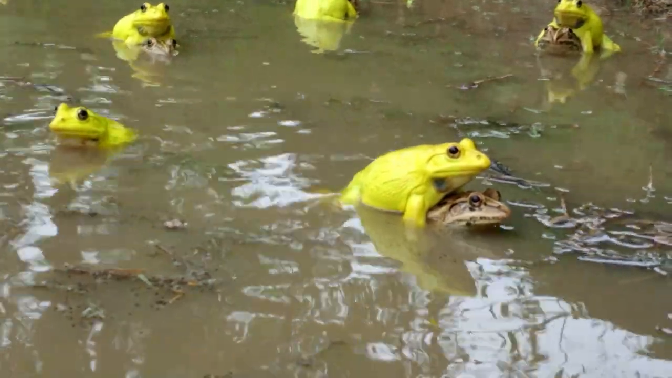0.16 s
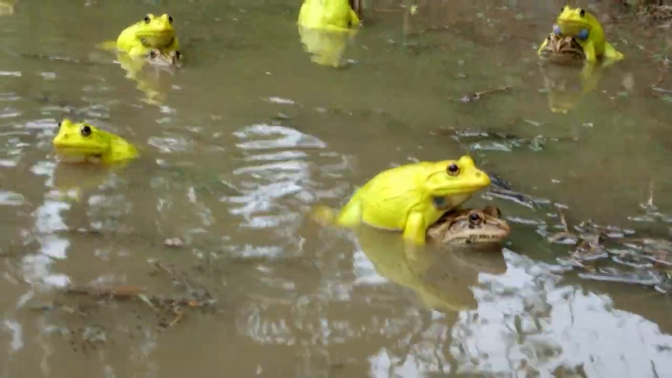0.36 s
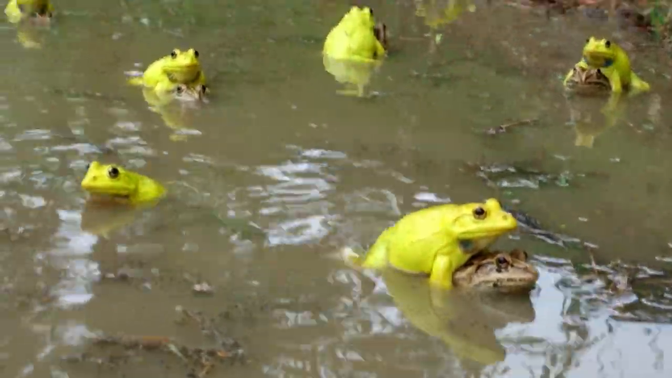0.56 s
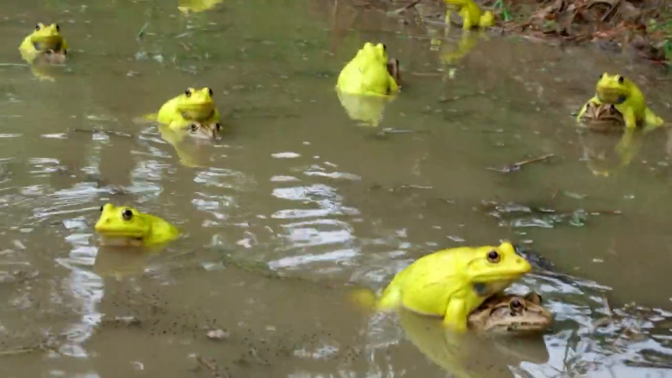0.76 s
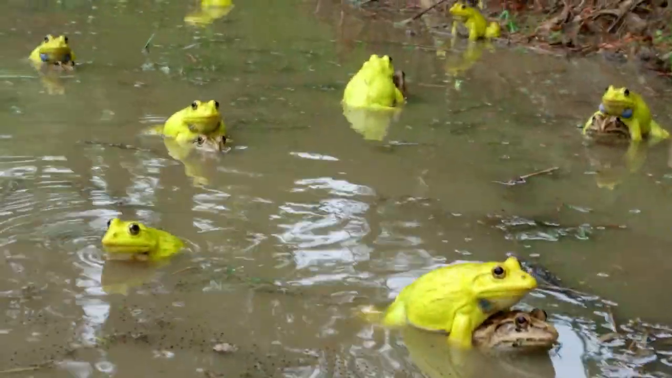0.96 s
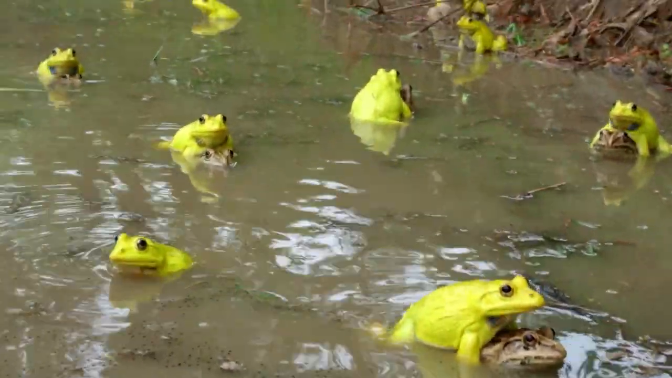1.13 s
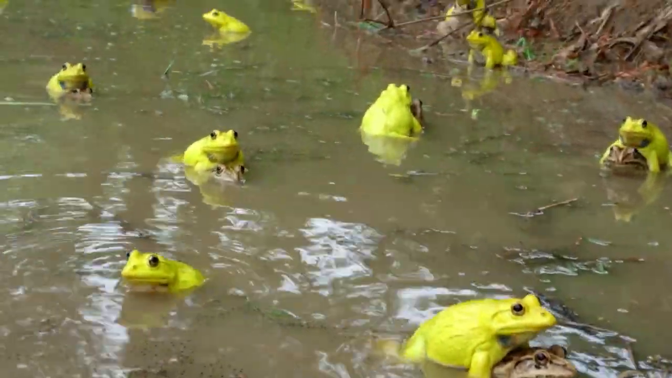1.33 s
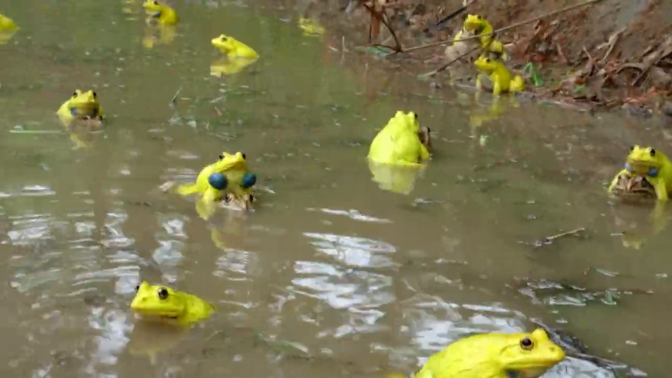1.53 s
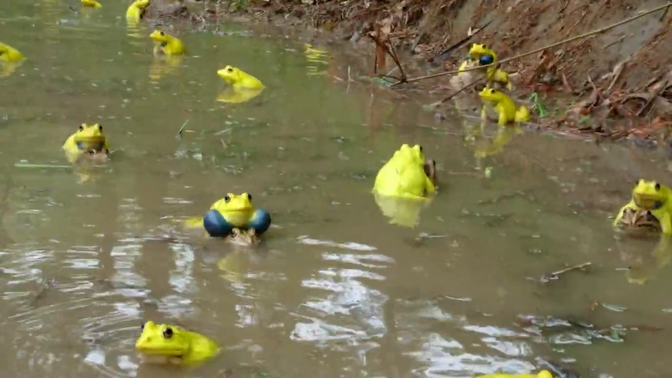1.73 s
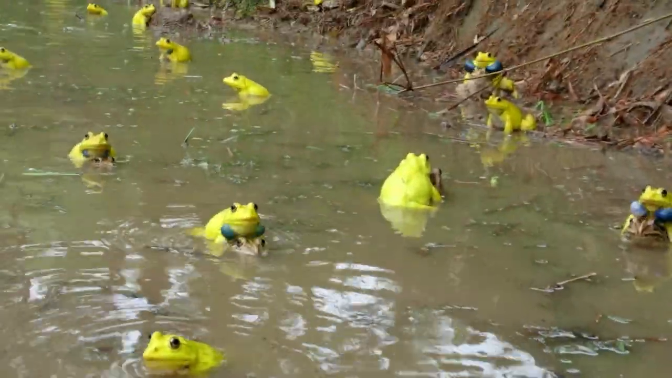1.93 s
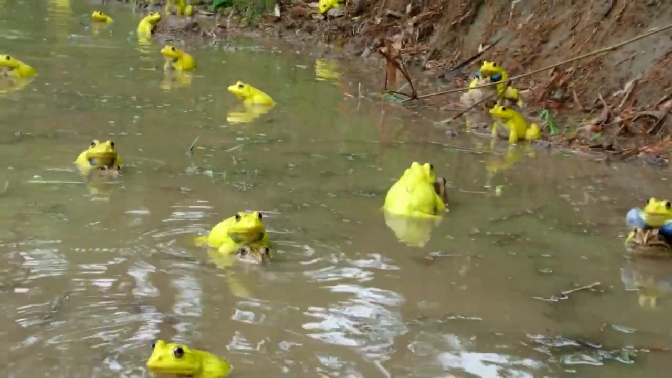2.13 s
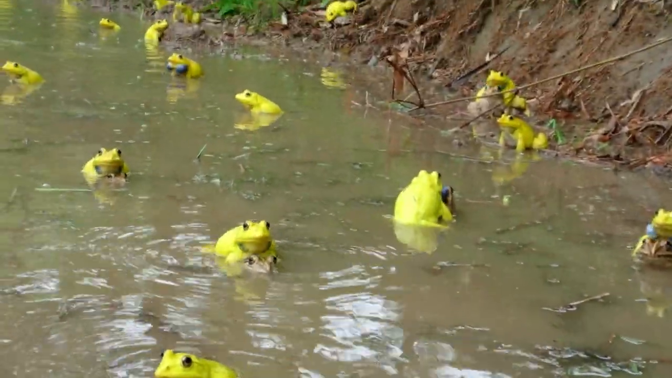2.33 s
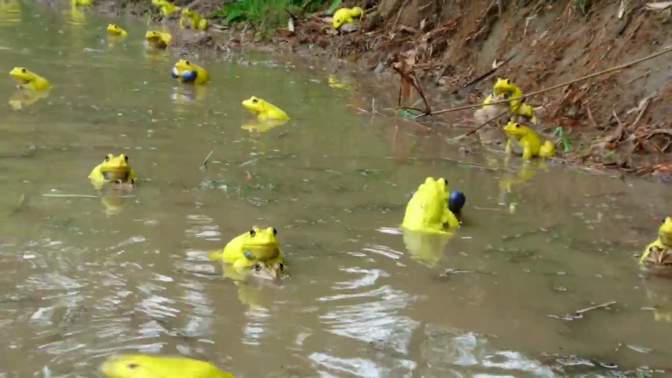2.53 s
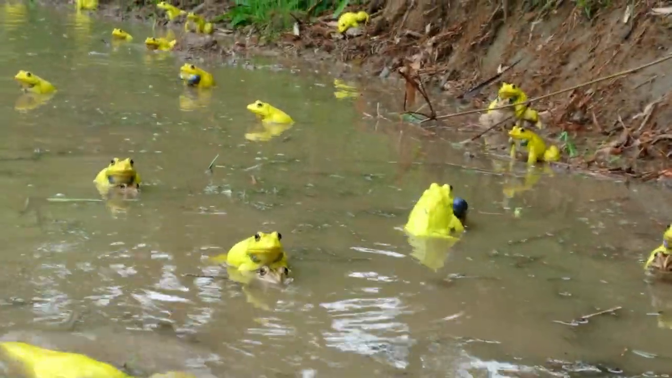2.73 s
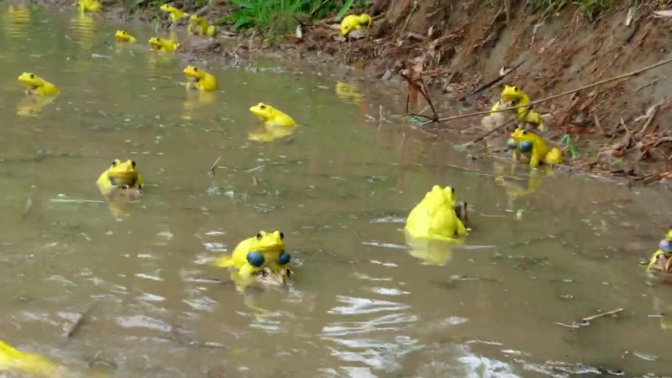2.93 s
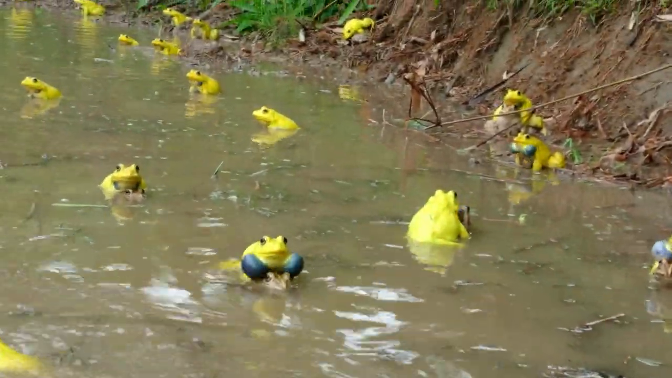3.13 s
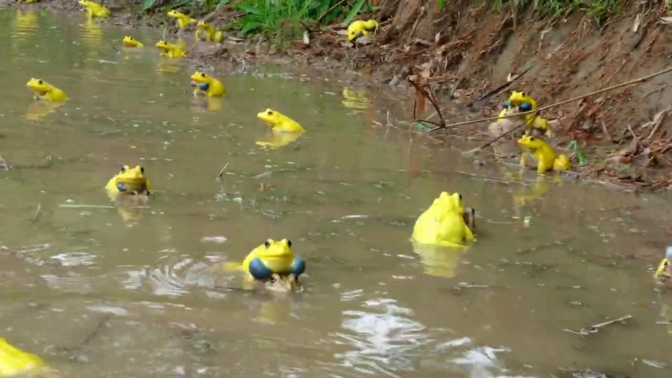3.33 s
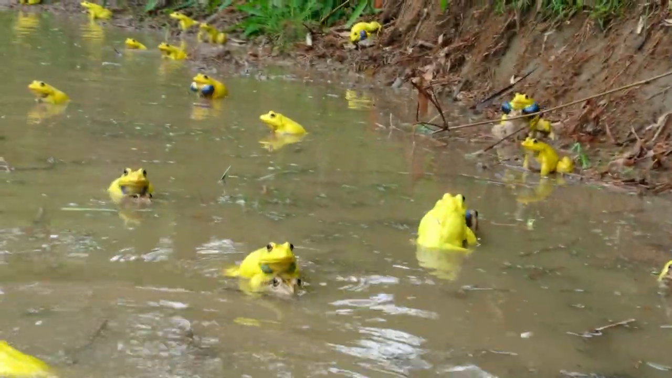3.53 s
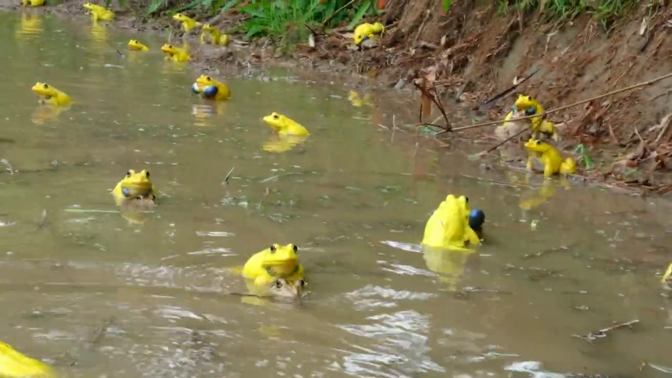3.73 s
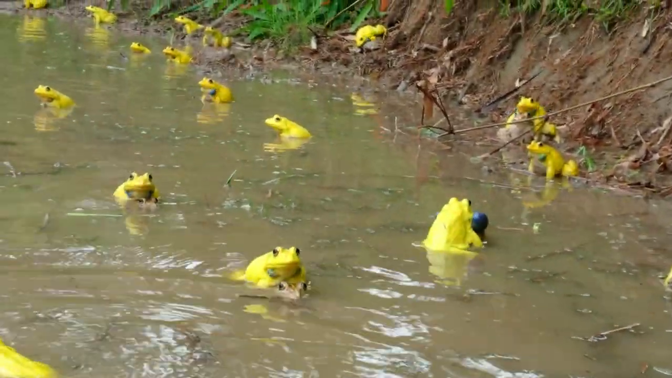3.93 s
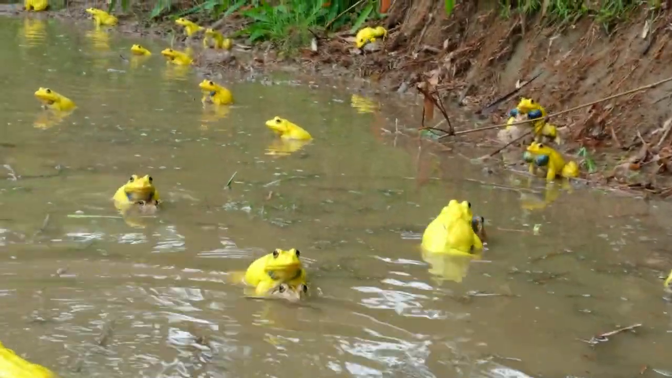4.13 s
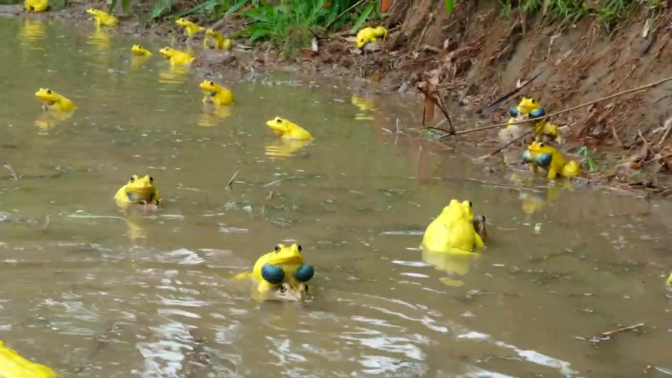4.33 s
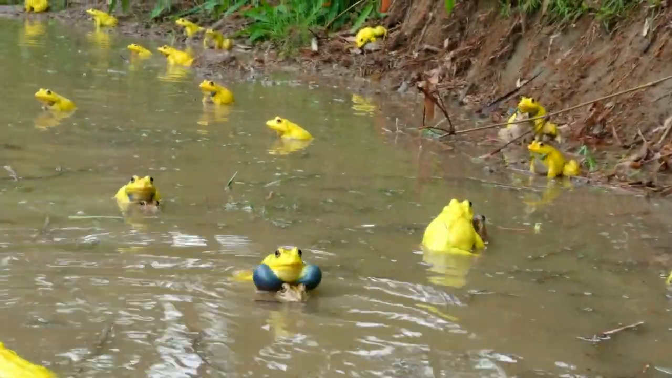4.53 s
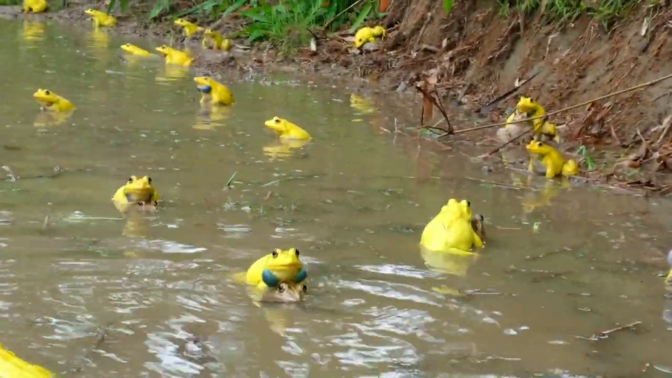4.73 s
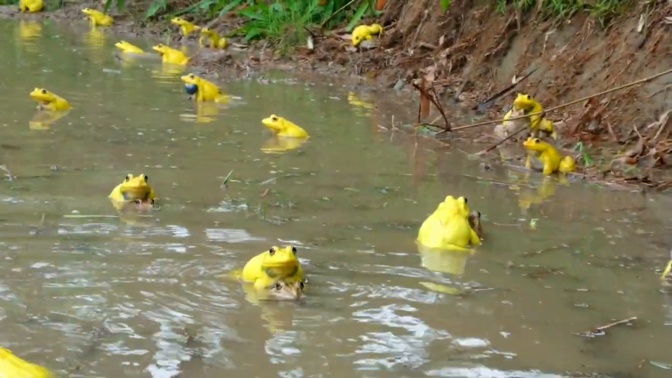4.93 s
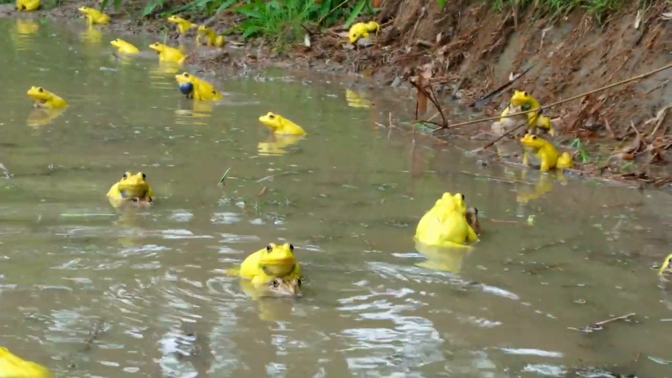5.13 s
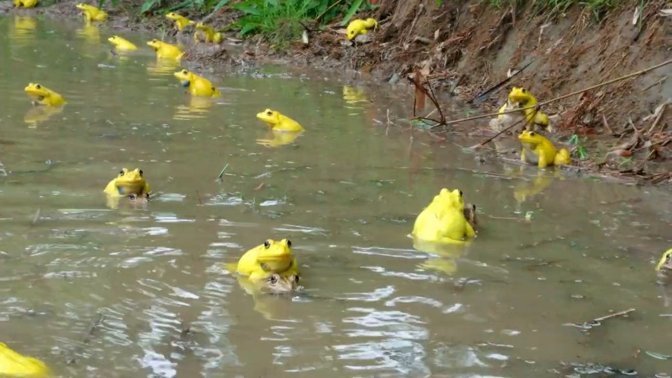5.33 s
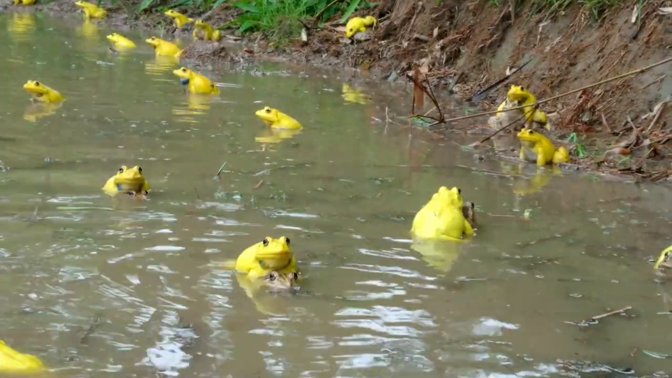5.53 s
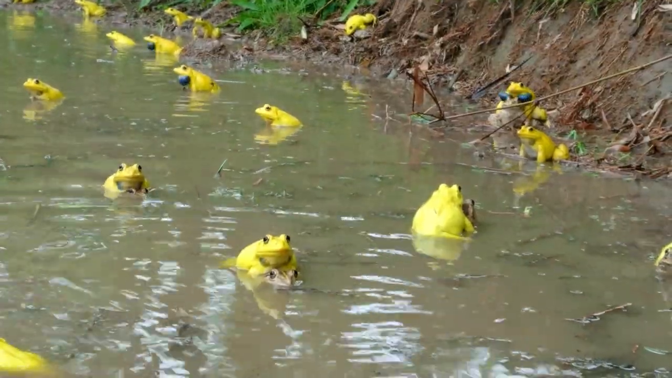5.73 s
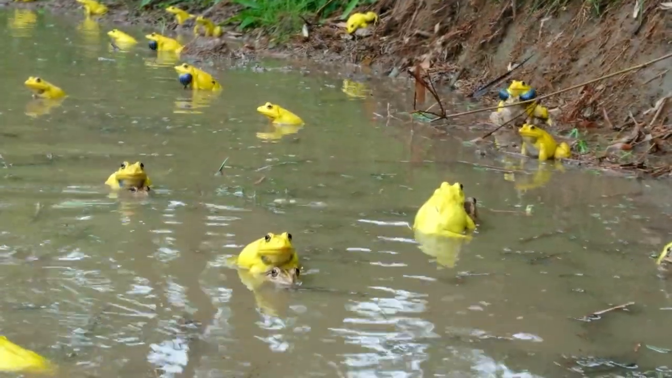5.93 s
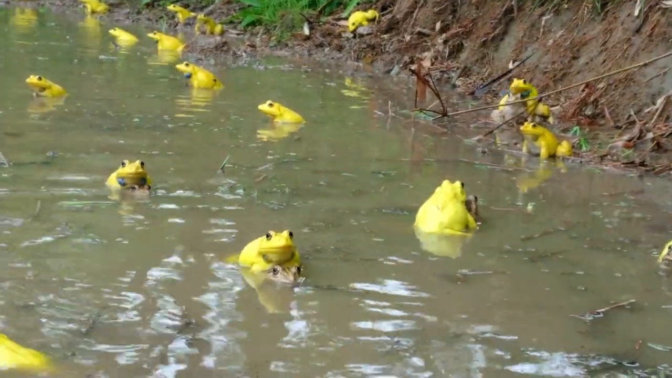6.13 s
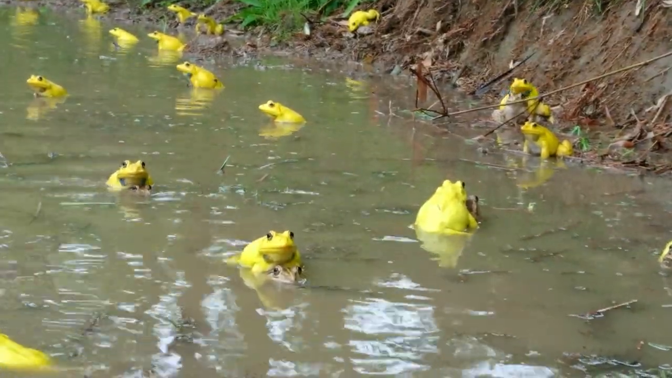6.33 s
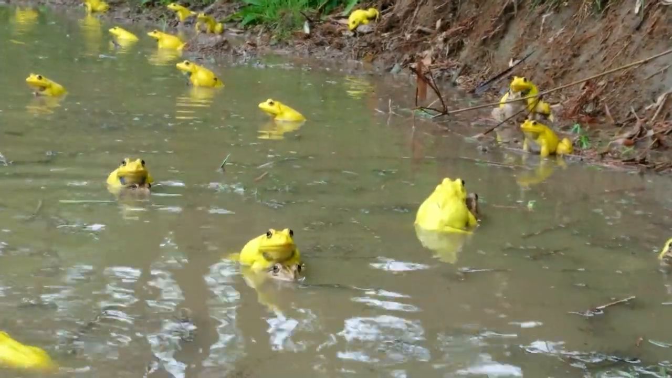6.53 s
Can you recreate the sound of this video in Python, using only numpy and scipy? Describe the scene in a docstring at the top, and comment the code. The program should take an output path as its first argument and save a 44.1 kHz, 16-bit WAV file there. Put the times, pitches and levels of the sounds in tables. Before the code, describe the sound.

Outdoors at a muddy pond, many frogs trade short, hard, pulsing croaks, each a fast train of hollow snaps that slows as it ends. Sparse at first, with ticking and chirps between, they become dense and loud, then grow faint and distant before one stronger call near the end. Light water splashes and soft air lie underneath. The close microphone overloads slightly, with a short echo off the bank.

```python
"""Male bullfrogs croak over one another in a shallow muddy pond below an earth bank, over a soft bed of air.
It opens inside a croak; a thin insect hiss and one frog's soft ticks fill the first lull, then a bird chirps.
The croaks crowd together, one with a shrill ring, and thin out; late on comes a long faint insect tone.
Each croak is a train of snaps, about 75 a second, that rings the vocal sacs and slows as the air runs out.
Small splashes come now and then; they, the hiss and the air are shaped noise, bird and tone pure glides."""
import sys
import numpy as np
from scipy import signal
from scipy.fft import rfft, irfft
from scipy.io import wavfile
from scipy.ndimage import uniform_filter1d, minimum_filter1d

SR = 44100
rng = np.random.default_rng(int(sys.argv[2]) if len(sys.argv) > 2 else 0)


def bounce(signal):
    """Save signal as a 16-bit WAV file at the path given by the first command-line argument."""
    frames = np.transpose(np.atleast_2d(signal))
    limited = np.clip(frames, -1, 1)
    pcm = np.round(limited * 32767).astype(np.int16)
    wavfile.write(sys.argv[1], SR, pcm)


N = 289737  # length in samples, about 6.6 s


def from_db(db):
    """Turn decibels into a plain multiplier."""
    return 10 ** (np.asarray(db) / 20)


def panned(x, pan_db):
    """Share a sound between left and right; a positive pan_db makes the left louder."""
    return x * from_db([[pan_db / 2], [-pan_db / 2]])


def add(out, start_s, x):
    """Mix x into out from start_s on, leaving off whatever falls outside."""
    at = round(start_s * SR)
    first, last = max(at, 0), min(at + x.shape[1], N)
    out[:, first:last] += x[:, first - at:last - at]


def cut(x, hz, kind, order):
    """Butterworth filter: "low" keeps what is below hz, "high" what is above."""
    sos = signal.butter(order, min(hz, .45 * SR), kind, fs=SR, output="sos")
    return signal.sosfilt(sos, x)


def noise(colour, size):
    """Stereo hiss whose spectrum follows the (pitch_hz, level_db) points; average power 1."""
    hz, db = np.transpose(colour)
    bin_hz = np.arange(size // 2 + 1) * SR / size
    gain = from_db(np.interp(np.log(bin_hz + 1), np.log(hz), db))
    x = irfft(rfft(rng.standard_normal((2, size))) * gain, size)
    return x / x.std()


def ring(t, hz, width_hz, hold_s=0):
    """A resonance struck at t = 0; a wider one dies faster, and hold_s delays the dying."""
    after = np.maximum(t, 0)
    fade = np.exp(-np.pi * width_hz * (np.hypot(after, hold_s) - hold_s))
    return fade * np.sin(2 * np.pi * hz * after)


def falling_ring(t, hz, width_hz, fall_hz, fall_s=.005):
    """A resonance that starts sharp by fall_hz and sinks to its pitch within each pulse."""
    after = np.maximum(t, 0)
    cycles = hz * after + fall_hz * fall_s * (1 - np.exp(-after / fall_s))
    return np.exp(-np.pi * width_hz * after) * np.sin(2 * np.pi * cycles)


def swing(t, hz, spread_s):
    """A few cycles that swell and fade around t = 0."""
    return np.exp(-.5 * (t / spread_s) ** 2) * np.cos(2 * np.pi * hz * t)


def arch(points, u):
    """A smooth bend through the values at the opening, middle and close of a call."""
    return np.polyval(np.polyfit([0, .5, 1], points, 2), u)


# Colour of the sound scattered by the bank: pitch_hz [Hz], relative level_db [dB]
BANK_COLOUR = [(200, 5.5), (500, 23.5), (1500, 21.5), (3500, 22.5), (6000, 15), (16000, -26)]


def pond_echoes(x, nearness_db=0, ripple_db=-22, scatter_db=-8.8, t60=0.22):
    """Each use draws a few short reflections and a scatter from the bank that fades 60 dB in t60 seconds."""
    t = np.arange(SR // 5) / SR
    scatter = noise(BANK_COLOUR, size=len(t)) * from_db(-60 * t / t60) * (t > .002)
    scatter = scatter / np.sqrt(np.sum(scatter ** 2) / 2)
    response = from_db(scatter_db - nearness_db) * scatter
    response[:, 0] += 1  # the direct sound
    for lag_s in rng.uniform(0.00047, 0.002895, 3):
        reflection = from_db(ripple_db) * rng.uniform(0, 2, 2) * rng.choice([-1, 1])
        response[:, round(lag_s * SR)] += reflection
    return signal.fftconvolve(x[None], response, axes=1)


# Colour of still air, with a low hum and insect hiss: pitch_hz [Hz], relative level_db [dB per Hz]
AIR_COLOUR = [(25, -17), (60, -5), (100, -3), (140, 8.5), (200, -10), (500, -8), (1000, -19), (2500, -9),
              (3800, -8), (5300, -13), (6500, -25), (8400, -22.5), (9700, -9.5), (11200, -30), (16000, -33)]


def still_air(level_db=-56.3, pan_db=-3.5):
    """Steady coloured noise, a little stronger on the right."""
    return panned(from_db(level_db) * noise(AIR_COLOUR, size=N), pan_db)


# Far insects' thin trills: start_s [s], length_s [s], pitch_hz [Hz], width_hz [Hz], level_db [dB]
TRILLS = [(.42, .45, 5250, 600, -65), (.98, .75, 6700, 250, -70)]


def insect_trills():
    """Narrow bands of hiss that fade in and out."""
    out = np.zeros((2, N))
    for start_s, length_s, hz, width_hz, level_db in TRILLS:
        size = round(length_s * SR)
        band = [(hz - 2 * width_hz, -70), (hz - width_hz / 2, 0),
                (hz + width_hz / 2, 0), (hz + 2 * width_hz, -70)]
        hiss = noise(band, size=size)
        add(out, start_s, from_db(level_db) * signal.windows.tukey(size, .5) * hiss)
    return out


# Short bird chirps and, in the last row, a long faint insect tone:
# start_s [s], length_s [s], start_pitch_hz [Hz], end_pitch_hz [Hz], level_db [dB]
CHIRPS_AND_TONE = [(0.99, 0.052, 4660, 4630, -63), (1.115, .05, 4200, 4360, -52),
                   (1.31, 0.042, 4250, 4380, -51.5), (5.152, 0.85, 4770, 4820, -66)]


def bird_chirps_and_insect_tone():
    """Pure tones that glide in pitch, swell and fade, and echo around the pond."""
    out = np.zeros((2, N))
    for start_s, length_s, from_hz, to_hz, level_db in CHIRPS_AND_TONE:
        hz = np.linspace(from_hz, to_hz, round(length_s * SR))
        tone = np.hanning(len(hz)) * np.sin(2 * np.pi * np.cumsum(hz) / SR)
        add(out, start_s, pond_echoes(from_db(level_db) * tone))
    return out


# Splashes: start_s [s], relative level_db [dB], decay_s [s], left_over_right_db [dB]
SPLASHES = [(.298, -37, .008, -5), (.318, -37, .008, -5), (2.32, -42, .02, -2), (2.5182, -38, .025, 1),
            (2.6, -40, .035, 1.5), (2.6776, -40.5, .035, 4), (3.9904, -39.5, .03, 0),
            (4.0547, -39, .03, -1), (4.11, -39.5, .03, 3), (4.267, -38, .03, 2.5), (4.3744, -31, .012, -.5),
            (5.3264, -36, .02, -2.5), (6.4017, -41, .022, 2)]
# Colour of the splashes: pitch_hz [Hz], relative level_db [dB per Hz]
SPLASH_COLOUR = [(500, -5), (2000, -2.5), (5500, 2), (8000, -5), (12000, -5), (16000, -3.5)]


def splashes(gain_db=-7.5, grain_db=4, rise_s=.0035):
    """A frog stirs the water: a slap that breaks up into spray, made of noise with an uneven level."""
    out, t = np.zeros((2, N)), np.arange(SR // 6) / SR
    for start_s, level_db, decay_s, pan_db in SPLASHES:
        unevenness = np.interp(t, t[::60], rng.standard_normal(len(t[::60])))
        grains = from_db(grain_db * unevenness)
        envelope = np.exp(-t / decay_s) * (1 - np.exp(-t / rise_s))
        spray = noise(SPLASH_COLOUR, size=len(t)) * grains * envelope
        add(out, start_s, panned(from_db(level_db + gain_db) * spray, pan_db))
    return out


# One frog's slow ticks: start_s [s]
TICKS = [.4873, .5177, .5481, .5791, .608, .6369, .6674]


def ticking_frog(sac_hz=1820, width_hz=130, upper_hz=3700, upper_db=-13, level_db=-39):
    """Slow separate snaps of one frog in the lull, each ringing at two pitches."""
    out, t = np.zeros((2, N)), np.arange(SR // 30) / SR
    snap = ring(t, sac_hz, width_hz) + from_db(upper_db) * ring(t, upper_hz, width_hz)
    tick = pond_echoes(cut(snap, 1200, "high", order=3))
    for start_s in TICKS:
        add(out, start_s, from_db(level_db) * tick)
    return out


def squeak(start_s=3.861, rate=73, from_hz=3880, to_hz=3480, fall_s=0.029, width_hz=130,
           level_db=-21.5, fade_s=.13):
    """One croak breaks into a shrill ring: 15 pulses, rate per second, that slide down and fade."""
    out, t = np.zeros((2, N)), np.arange(SR // 30) / SR
    for s in np.arange(15) / rate:
        hz = to_hz + (from_hz - to_hz) * np.exp(-s / fall_s)
        pulse = from_db(level_db) * np.exp(-s / fade_s) * ring(t, hz, width_hz)
        add(out, start_s + s, panned(pond_echoes(pulse), pan_db=-12))
    return cut(out, 4250, "low", order=8)


def pulse_times(length_s, rates, jitter_s=.00006):
    """Moments at which the larynx snaps open, slightly uneven; the rate bends through three values."""
    u = np.linspace(0, 1, 200)
    cycles = np.cumsum(arch(rates, u)) * length_s / len(u)
    times = np.interp(np.arange(.5, cycles[-1]), cycles, u * length_s)
    return times + rng.normal(0, jitter_s, len(times))


def call_effort(u, crest, swell, threshold):
    """Breath pressure swells to a crest and falls; a tight larynx waits for pressure, then bursts."""
    crest_bend = np.log(.5) / np.log(np.clip(crest, .1, .9))
    effort = np.abs(np.sin(np.pi * u ** crest_bend)) ** swell
    return effort / (1 + (threshold / (effort + 1e-3)) ** 6)


def sac_ring(t, u, hz, width_hz, build, slack_db, build_s=0.00058, damping=0.52, hold_s=.0007,
             slack_hz=1290, slack_width_hz=170, slack_from=0.22, slack_full=.7,
             body_hz=770, body_width_hz=130, body_db=-11.5):
    """The sacs swell up to each snap and ring on; as they slacken they ring shorter and lower modes join in."""
    build_up = np.exp(-np.abs(t) / build_s) * (t < 0)
    lead_in = np.clip(build, 0, 1) * build_up * np.sin(2 * np.pi * hz * t)
    main = lead_in + ring(t, hz, width_hz * np.exp(damping * (u - .5)), hold_s)
    slackness = np.interp(u, [slack_from, slack_full], [.35, 1])
    slack_mode = slackness * ring(t, slack_hz, slack_width_hz)
    body_mode = from_db(body_db) * ring(t, body_hz, body_width_hz)
    return main + from_db(slack_db) * (slack_mode + body_mode)


def croak(length_s, crest, rates, sac_hz, threshold, bass_db, treble_db,
          sac_width_hz, build, swell, split_ms, throat_hz, throat_db, slack_db,
          upper_hz, upper_width_hz, upper_db, upper_fall_hz, rasp_db, overload_db,
          shimmer_db=1.4, throat_swell=.75, throat_lead_s=.00334, throat_spread_s=.0023,
          throat_jitter_s=.00009, choke_s=.0094, merge_at=.58,
          opening_hz=990, opening_db=-18.5, opening_lead_s=.00095, opening_spread_s=.00046,
          rasp_s=.004, rasp_rise_s=.001,
          overtone_hz=6000, overtone_width_hz=130, overtone_db=-8, overtone_stretch=.55,
          crackle_s=.00034, crackle_size=.27, thud=.75, edge_db=16):
    """One call: in every cycle a low throat swing builds up, the larynx opens, and a snap sets the sacs ringing.
    Returns the voice, and the microphone overload together with a high overtone."""
    times = pulse_times(length_s, rates)[:, None]  # one row for each snap
    u = np.clip(times / length_s, 0, 1)  # how far the call has run, 0-1
    effort = call_effort(u, crest, swell, threshold)
    hz = arch(sac_hz, u)
    tension = hz / sac_hz[1]  # other resonances follow the stretch of the sacs
    strength = effort * from_db(rng.normal(0, shimmer_db, u.shape))
    index = np.round(times * SR).astype(int) + np.arange(-440, 700)
    t = index / SR - times  # seconds before or after each snap

    def train(pulses):
        """Add the overlapping pulses together into one sound."""
        weighted = strength * pulses * (index > 0)
        return np.bincount(np.maximum(index, 0).ravel(), weighted.ravel())

    # the throat starts before the sacs and outlasts them
    lead = throat_lead_s + rng.normal(0, throat_jitter_s, u.shape)
    throat = from_db(throat_db + bass_db) * swing(t + lead, throat_hz * tension, throat_spread_s)
    throat = throat * (effort + .01) ** (throat_swell - 1)
    opening = from_db(opening_db) * swing(t + opening_lead_s, opening_hz, opening_spread_s)

    # in some frogs the two sacs snap one after the other until they merge at merge_at of the call
    split_s = split_ms / 1000 * np.sqrt(np.maximum(1 - u / merge_at, 0))
    sacs = sum(sac_ring(t + side * split_s, u, hz, sac_width_hz, build, slack_db) for side in (-.5, .5))
    sacs = sacs / np.where(split_s > 0, np.sqrt(2), 2)
    upper = falling_ring(t, upper_hz * tension ** .5, upper_width_hz, upper_fall_hz)
    sacs = sacs - from_db(upper_db + treble_db) * upper
    sacs = sacs * np.exp(-(np.maximum(t, 0) / choke_s) ** 4)  # the closing larynx chokes the ring
    voice = cut(train(throat + opening + sacs), 268, "high", order=6)
    voice = cut(voice, 3900, "low", order=6)

    # air rasps through around and after each snap
    puff = np.exp(np.minimum(t / rasp_rise_s, -t / rasp_s))
    rasp = train(from_db(rasp_db + treble_db) * rng.standard_normal(t.shape) * puff)
    rasp = cut(cut(rasp, 3700, "low", order=3), 600, "high", order=2)

    # the loudest snaps overload the microphone, adding a sharp edge, crackle and low thud
    edge = cut(train(ring(t, hz, sac_width_hz) * effort ** 2), 4200, "high", order=8)
    edge = from_db(edge_db) * cut(edge, 8800, "low", order=2)
    crackle = crackle_size * rng.standard_normal(t.shape)
    snap = (crackle - thud) * np.exp(-np.abs(t) / crackle_s) * effort ** 3
    # a high overtone gains on the rest late in the call
    overtone = ring(t, overtone_hz * tension ** overtone_stretch, overtone_width_hz)
    overtone = from_db(overtone_db) * overtone * u ** 2
    overload = from_db(overload_db) * cut(edge + train(snap + overtone), 8000, "low", order=1)
    return voice + rasp, overload


# Croaks: start_s, end_s [s], crest [loudest point, 0-1], relative level_db [dB],
# opening_rate, middle_rate, closing_rate [snaps per s], opening_hz, middle_hz, closing_hz [sac pitch, Hz],
# extra bass_db, extra treble_db, dryness_db [dB less bank scatter], voice [name]
CROAKS = [(-.0115, .345, .39, -9.5, 69, 72.5, 67, 1490, 1580, 1500, -1, 1.5, 1, "hoarse"),
          (.118, .429, .26, -14.8, 78, 74.94, 67.8, 1750, 1910, 1820, -1, 2, 1, "hoarse"),
          (.685, 1.015, .5, -8.5, 77.6, 78, 67.3, 1650, 1968, 1715, -2, 3, 3, "high"),
          (1.062, 1.41, .47, -10.5, 75.06, 72.35, 65.4, 1500, 1606, 1500, -1, 3, 1, "hoarse"),
          (1.102, 1.472, .42, -13, 81.1, 76.23, 66.34, 1750, 1966, 1830, -1, 2, 0, "reedy"),
          (1.403, 1.7, .5, -10.5, 77.06, 76.6, 66.6, 1800, 1914, 1750, 2, 3, 3, "high"),
          (1.589, 1.907, .45, -.5, 75.87, 77.7, 67, 1650, 1670, 1480, 2, 1, 5, "near"),
          (1.755, 2.069, .52, -5, 75, 76.04, 68.56, 1750, 1713, 1560, -1, 1, 4, "round"),
          (1.982, 2.279, .38, -3, 83.7, 76.04, 69.3, 1760, 1752, 1600, -1, 1, 3, "bright"),
          (2.145, 2.429, .49, -12, 72.73, 72.6, 63.7, 1850, 1960, 1760, 0, 4, 2, "high"),
          (2.3, 2.6, .42, -12, 73.34, 72.25, 64.9, 1500, 1604, 1510, -1, 1, 0, "hoarse"),
          (2.406, 2.786, .32, -6.5, 79.93, 76.28, 66.2, 1795, 1880, 1760, -1, 2, 4, "reedy"),
          (2.552, 2.903, .52, -15, 72.1, 70.07, 62.97, 1750, 1775, 1650, 0, 0, 0, "hoarse"),
          (2.766, 3.108, .58, -10, 79, 77.9, 69.3, 1880, 1845, 1720, -3, 1, 1, "ringing"),
          (3.045, 3.345, .42, -4.5, 77, 75.5, 68.96, 1760, 1780, 1630, 0, 2, 4, "round"),
          (3.025, 3.385, .4, -1.5, 77.94, 76.8, 70.64, 1680, 1700, 1530, 1, 2, 4, "near"),
          (3.344, 3.711, .53, -4.8, 75.18, 74.96, 68.8, 1690, 1680, 1510, -1, 2, 4, "deep"),
          (3.409, 3.797, .55, -10.5, 77.16, 75.34, 67.4, 1710, 1820, 1670, -2, 3, 2, "hoarse"),
          (3.588, 4.099, .63, -3.8, 77.5, 75, 63.1, 1674, 1790, 1590, -1, 3, 5, "reedy"),
          (3.723, 4.144, .22, -6.8, 77.2, 71.86, 62.34, 1270, 1350, 1275, 1, 4, 4, "deep"),
          (4.026, 4.41, .45, -7.5, 88.08, 79.1, 68.06, 1750, 1772, 1680, -1, 1, 2, "nasal"),
          (4.105, 4.42, .53, -5, 75.14, 74.67, 68.17, 1665, 1652, 1490, -2, 3, 3, "round"),
          (4.347, 4.699, .4, 0, 74.93, 77.04, 67, 1710, 1700, 1510, -1, 2, 5, "near"),
          (4.614, 4.94, .41, -5, 85.2, 76.4, 67.9, 1746, 1755, 1610, -1, 2, 3, "bright"),
          (4.859, 5.256, .24, -13.5, 72.95, 70.9, 64.1, 1580, 1720, 1670, -1, 0, 3, "reedy"),
          (5.107, 5.366, .29, -21.5, 73, 71.06, 66.5, 1680, 1690, 1530, 0, 1, 0, "far"),
          (5.348, 5.664, .43, -15, 77.24, 76.67, 73.1, 1580, 1620, 1560, -1, 0, 0, "far"),
          (5.606, 5.906, .52, -16, 72, 70.14, 60.95, 1284, 1540, 1460, 1, 0, 0, "reedy"),
          (5.682, 6.021, .55, -5.8, 73.9, 76.5, 68.3, 1650, 1670, 1560, 0, 4, 5, "round"),
          (5.966, 6.296, .39, -13, 78.36, 74.94, 65.2, 1760, 1990, 1730, 3, 2, 5, "high"),
          (6.09, 6.502, .32, -16, 77.8, 76.1, 71.2, 1620, 1640, 1530, 0, 2, -1, "far")]
# Kinds of voice, by name: sac_width_hz [Hz, mid-call], build [build-up before the snap, 0-1],
# swell [power of the loudness curve], split_ms [gap between the sacs at the opening, ms],
# throat_hz [Hz], throat_db, slack_db [dB], upper_hz, upper_width_hz [Hz], upper_db [dB],
# upper_fall_hz [Hz], rasp_db, overload_db, left_over_right_db [dB], right_ear_lag_ms [ms]
VOICES = {"near": (188, .42, .95, 0, 438, -15, -9, 3239, 299, -11, 0, -35, -20.5, -1.5, .06),
          "bright": (157, .3, 1.13, 0, 456.5, -13, -13, 3336, 238.5, -12, 0, -35, -19.5, -3.5, -.06),
          "round": (165, .58, 1.05, 0, 465.5, -16, -15, 3170.5, 238.5, -19.5, 0, -36, -36, -4.5, -.03),
          "high": (185, 1, 1.65, 3.3, 483, -16.5, -21, 3150, 600, -23, 0, -29, -45.5, -4, .1),
          "reedy": (240, .22, 1, 0, 465.5, -12.5, -14.5, 2951.5, 348, -12.5, 0, -36, -36, -3.5, .09),
          "ringing": (151, .4, 1.07, 0, 458, -15.5, -13, 3260, 120, -18.5, 420, -44, -46, -5, .07),
          "nasal": (170, .4, .94, 0, 469, -17, -14, 3269, 129, -13.5, 0, -37, -38.5, -4.5, .17),
          "hoarse": (244, .42, 1.25, 0, 458, -14.5, -16, 3380, 300, -18, 200, -33, -38, -4.5, .17),
          "deep": (205, .46, 1, 0, 469, -17, -17, 3250, 296, -17, 0, -36, -38.5, -5, .18),
          "far": (263, .1, .87, 0, 457, -13, -13, 2930.5, 349, -10.5, 0, -38, -35.5, -4, .21)}


def chorus(gain_db=.9, usual_db=-6, tightest=.33, tight_span_db=4, overload_pan_db=-5, overload_dry_db=-4):
    """All the croaks: the voice sets the colour and the place of each."""
    out = np.zeros((2, N))
    for (start_s, end_s, crest, level_db, rate_in, rate, rate_out, in_hz, sac_hz, out_hz,
         bass_db, treble_db, dry_db, voice) in CROAKS:
        *timbre, pan_db, lag_ms = VOICES[voice]
        # loud croaks start and stop abruptly
        threshold = tightest * np.clip((level_db - usual_db) / tight_span_db, 0, 1)
        call, overload = croak(end_s - start_s, crest, [rate_in, rate, rate_out], [in_hz, sac_hz, out_hz],
                               threshold, bass_db, treble_db, *timbre)
        gain = from_db(level_db + gain_db)
        left, right = panned(pond_echoes(gain * call, dry_db), pan_db)
        ms = np.arange(len(right)) / SR * 1000
        right = np.interp(ms - lag_ms, ms, right)
        add(out, start_s, np.array([left, right]))
        add(out, start_s, panned(pond_echoes(gain * overload, overload_dry_db), overload_pan_db))
    return out


def scene():
    """Frogs over the quiet sounds of the pond."""
    quiet = still_air() + insect_trills() + bird_chirps_and_insect_tone() + splashes()
    return quiet + ticking_frog() + squeak() + chorus()


def record(dry, ceiling=.88, cutoff_hz=15850):
    """A fast limiter holds the loudest snaps down; the top is cut."""
    gain = np.minimum(1, ceiling / (np.abs(dry).max(axis=0) + 1e-9))
    gain = uniform_filter1d(minimum_filter1d(gain, size=441), size=441)  # 441 samples = 10 ms
    top_cut = signal.ellip(10, .1, 80, cutoff_hz, fs=SR, output="sos")
    return signal.sosfilt(top_cut, dry * gain)


dry = scene()
out = record(dry)
bounce(out)
```